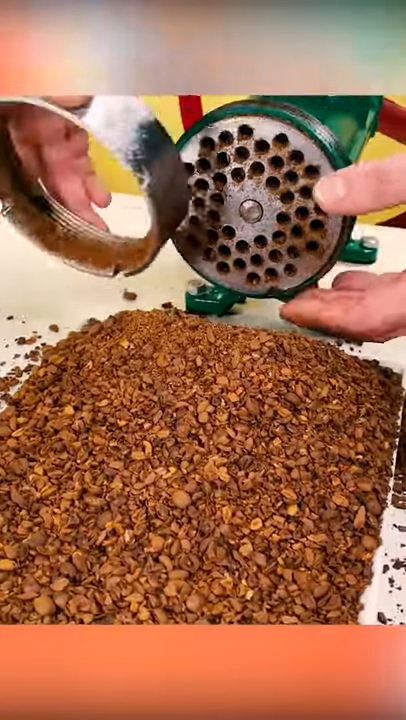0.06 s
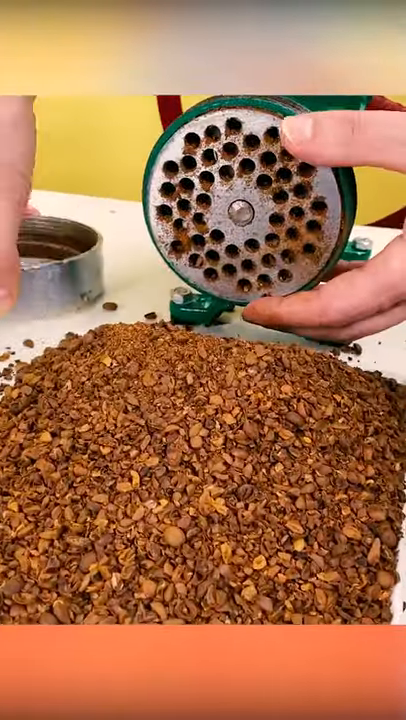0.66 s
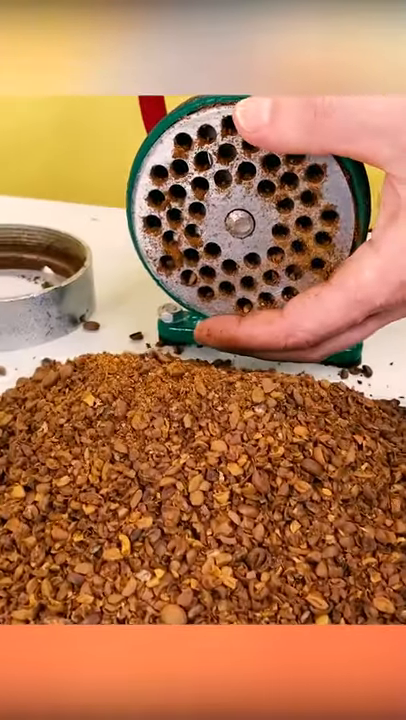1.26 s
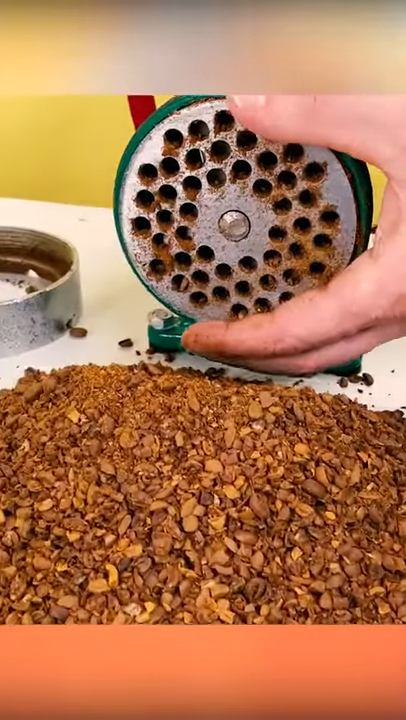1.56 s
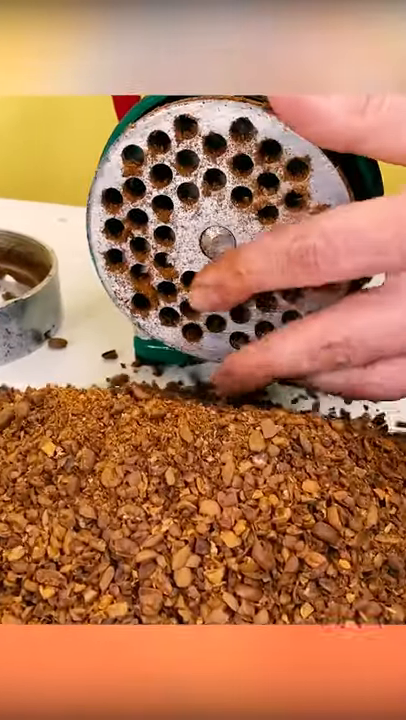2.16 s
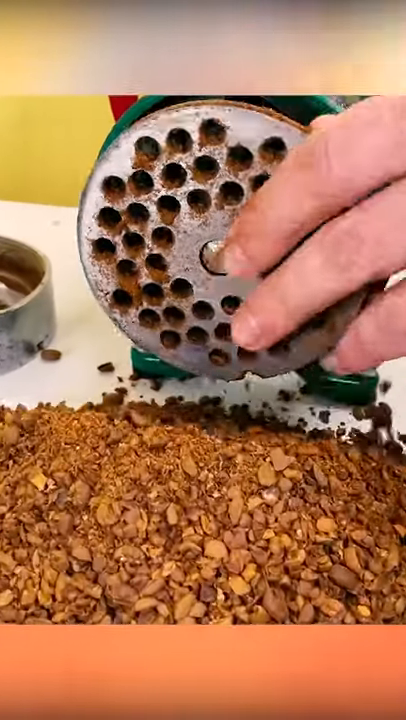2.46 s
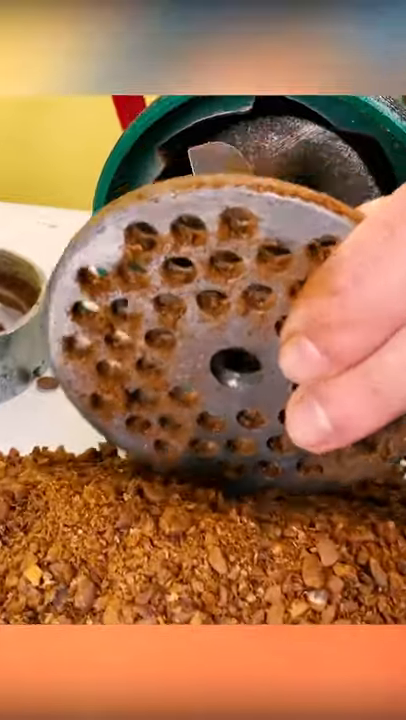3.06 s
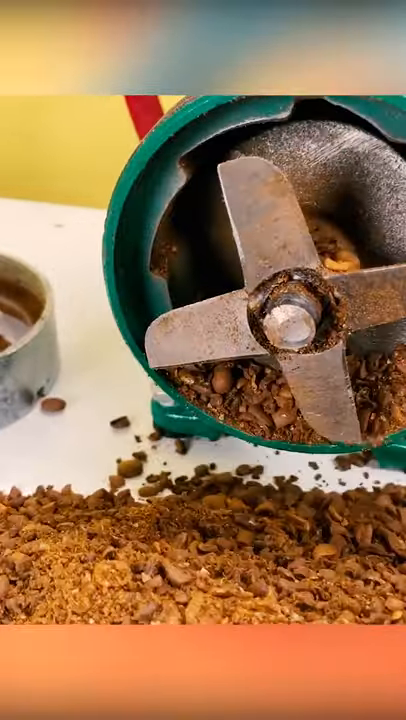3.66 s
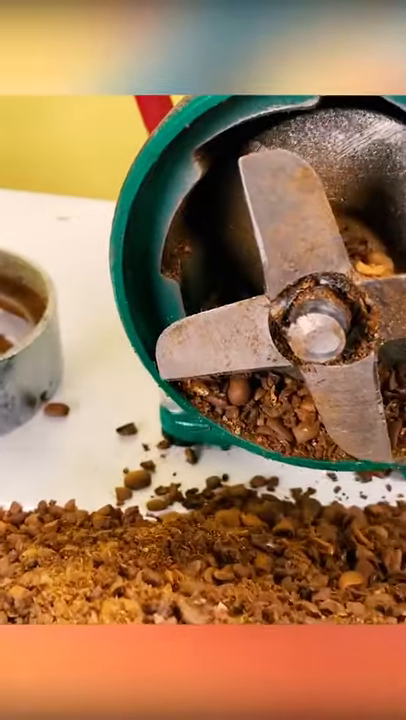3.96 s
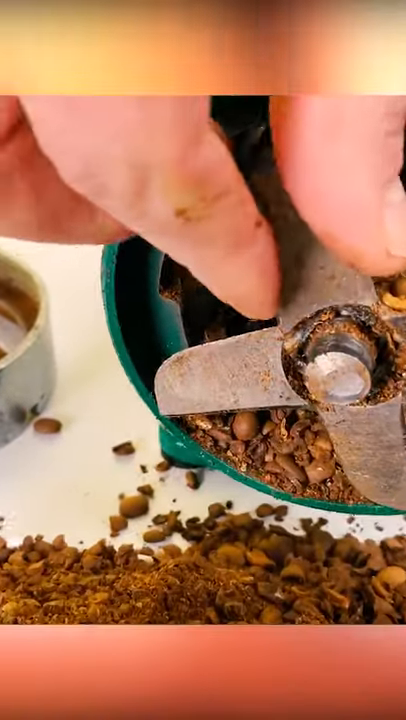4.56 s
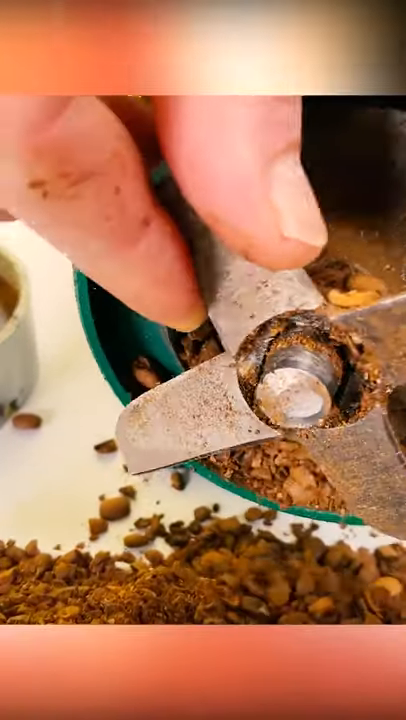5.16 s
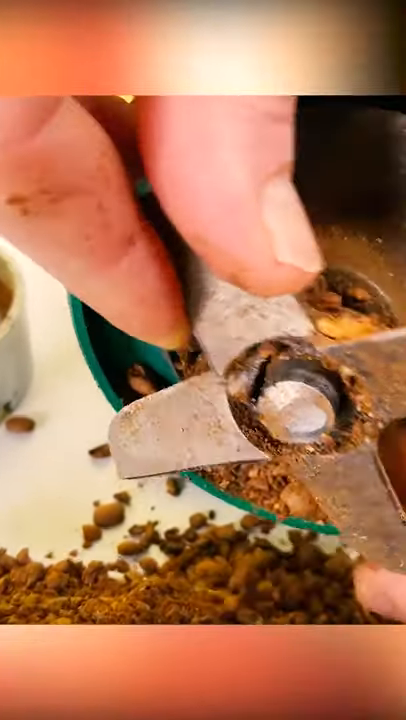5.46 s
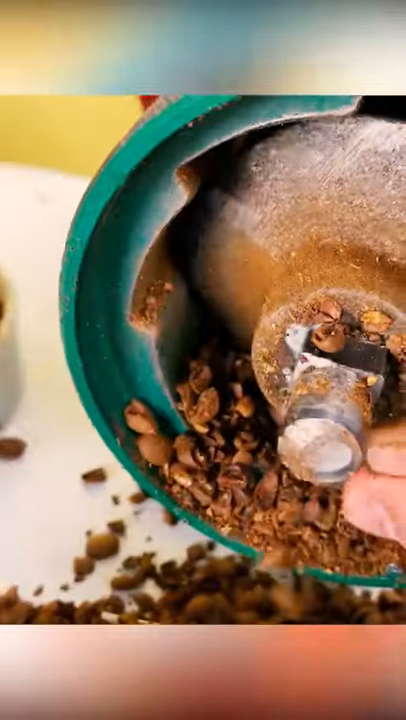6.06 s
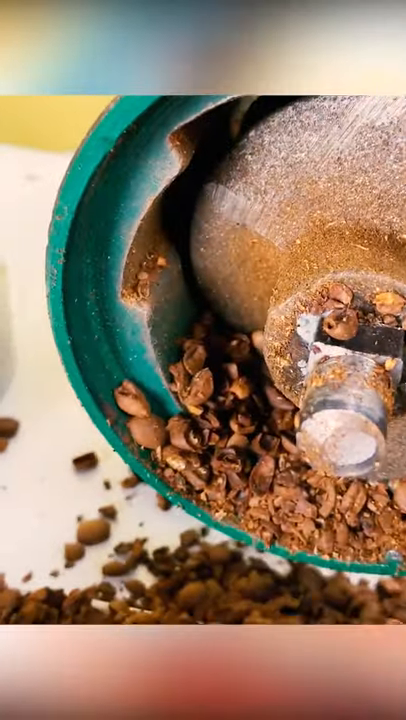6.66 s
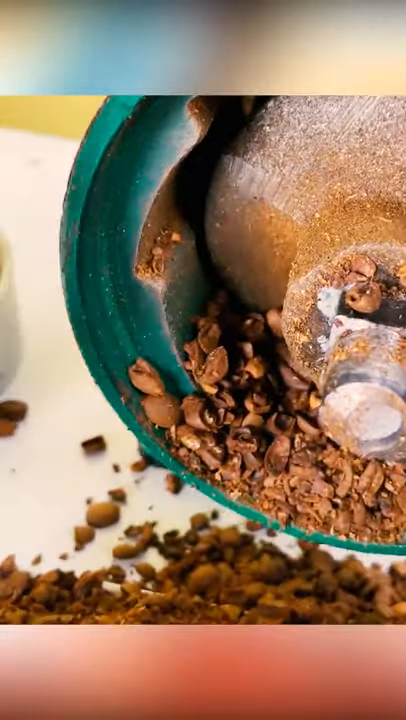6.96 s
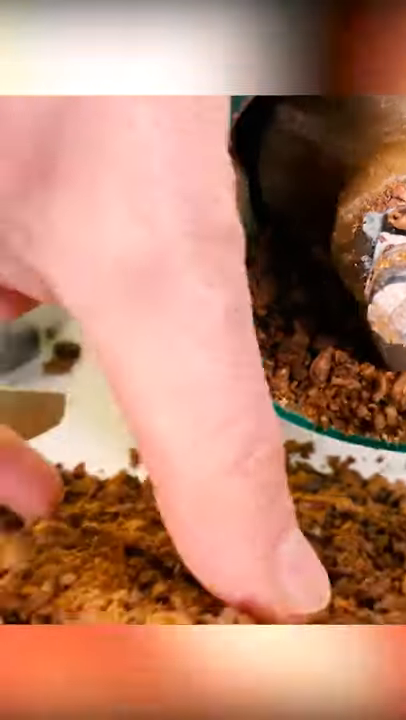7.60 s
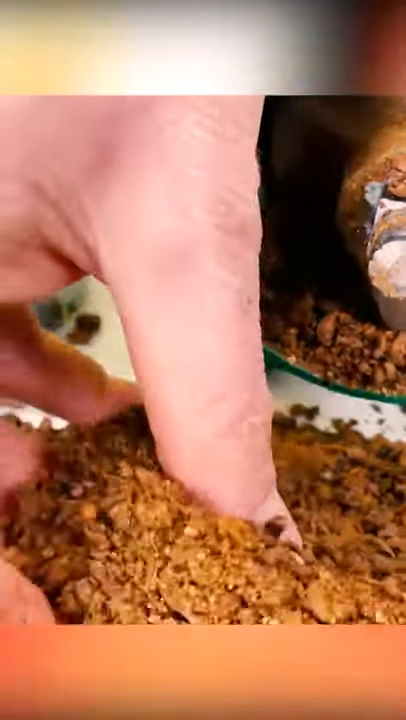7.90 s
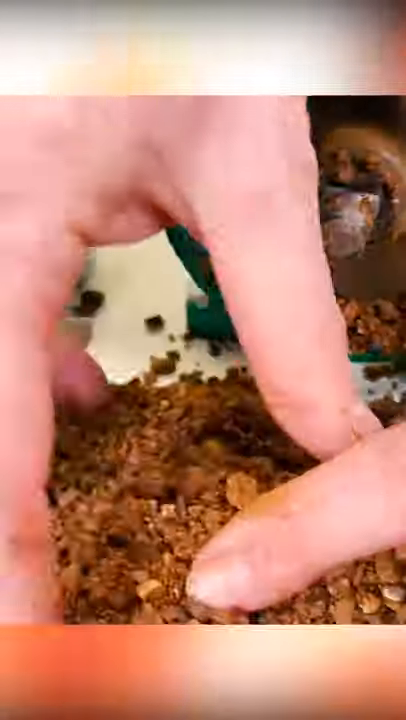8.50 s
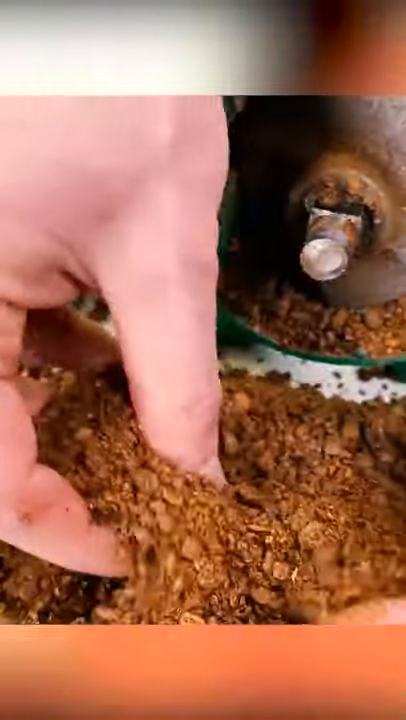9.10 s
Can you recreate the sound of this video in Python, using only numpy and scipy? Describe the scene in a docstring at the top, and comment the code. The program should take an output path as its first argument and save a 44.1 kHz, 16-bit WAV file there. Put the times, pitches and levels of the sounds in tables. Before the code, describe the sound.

A cast-iron grinder is taken apart on a table, close to the microphone in a live room with a faint low hum. At about 0.5 seconds a metal ring is put down with a solid double knock, then slides and rocks softly to rest. Around 1.8 seconds the steel plate judders loose, with a sharp clink at 2 seconds, followed by light scraping, small clinks and crunching coffee grit until about 3 seconds. Near 4 seconds the plate is laid aside with a light knock. From 4.6 to 5.7 seconds the blade is wiggled off its shaft with knocks, rasps and short metallic rings. At 6 seconds it drops with a loud, bright clatter, bouncing and skidding until about 6.6 seconds. After a short lull, from 7.4 seconds to just past 9, fingers dig through ground coffee with a softer, dry, gritty rustle and small crackles.

```python
"""A cast-iron grinder is taken apart on a table, close to a stereo microphone in a live room.
First the lock ring is put down and slides to rest. From 1.7 s the hole plate is worked loose, crushing
grit, and is laid aside. The cross knife is then wiggled off its shaft and dropped at 6 s with a clatter.
From 7.4 s fingers dig through ground coffee. Throughout, impacts excite the modes of metal and table,
friction acts in many small slips, and each brittle fracture radiates a short pulse."""
import sys
import numpy as np
from scipy import signal
from scipy.fft import rfft, irfft, next_fast_len
from scipy.io import wavfile
from scipy.ndimage import uniform_filter1d, map_coordinates

SR = 44100
rng = np.random.default_rng(int(sys.argv[2]) if len(sys.argv) > 2 else 0)


def put_to_file(sound):
    """Save the sound as 16-bit audio at rate SR, in the file named by the first command-line argument."""
    columns = np.atleast_2d(sound).T  # one column per channel
    safe = np.clip(columns, -1, 1)
    whole_steps = np.round(safe * 32767)
    wavfile.write(sys.argv[1], SR, whole_steps.astype(np.int16))


N = 411894
TOP_HZ = 16200  # band limit

# Table levels are relative: each source adds its own gain.
# Contacts of the parts with housing and table: t/s, knock level/dB, clack level/dB, tone label
# A label only selects a tone: the blow at 4.003 s is the light knock of the plate laid on the table.
BLOWS = [(0.539, -10, -25.5, "table"), (0.562, -11, -31, "table"), (0.823, -34, -42, "table"),
         (1.75, -29, -33.5, "plate rim"), (1.77, -23, -31, "plate face"), (1.776, -28.5, -24, "plate face"),
         (1.797, -22.5, -25.5, "plate face"), (1.812, -20, -27, "plate face"), (2.024, -69, -40.5, "pin"),
         (2.503, -42.5, -55.5, "plate edge"), (2.567, -42.5, -54.5, "plate edge"),
         (2.584, -43, -50.5, "plate edge"), (2.634, -44.5, -53, "plate edge"),
         (2.665, -48, -58, "plate edge"), (3.932, -57, -57, "plate face"), (4.003, -39, -35, "knife hub"),
         (4.197, -38.5, -54, "housing"), (4.346, -22, -43.5, "shaft end"), (4.805, -30.5, -35, "shaft"),
         (4.825, -28, -36.5, "shaft"), (4.911, -23.5, -41.5, "housing"), (4.938, -9, -26, "shaft end"),
         (4.957, -21.5, -29.5, "shaft"), (5.003, -22, -42.5, "shaft end"), (5.069, -31.5, -51.5, "housing"),
         (5.113, -37, -54, "housing"), (5.14, -28.5, -44, "housing"), (5.167, -23, -44.5, "housing"),
         (5.251, -29, -52.5, "housing"), (5.291, -25, -36, "housing"), (5.533, -39.5, -63.5, "table"),
         (5.571, -32, -54, "shaft end"), (6.027, -15.5, -30.5, "housing"), (6.041, -13.5, -12, "knife hub"),
         (6.06, -14, -21, "knife flat"), (6.079, -17.5, -18, "knife flat"), (6.15, -28, -26, "knife flat"),
         (6.199, -20.5, -20, "knife tip"), (6.242, -21.5, -50.5, "housing"),
         (6.266, -20.5, -49, "knife flat"), (6.301, -21.5, -48, "housing"),
         (6.463, -9.5, -11, "knife edge"), (6.531, -15.5, -17.5, "knife flat"),
         (6.545, -34, -22.5, "knife tip")]
SCRAPES = [(0.588, -19, -36, "table"), (0.818, -28, -44, "table"), (1.312, -55, -54, "foot"),
           (1.735, -34, -40.5, "plate rim"), (1.782, -29, -25.5, "plate rim"),
           (1.829, -32.5, -33, "plate rim"), (2.275, -44.5, -48, "foot"), (2.584, -32, -47.5, "housing"),
           (2.855, -44, -63, "foot"), (3.892, -41.5, -45.5, "plate face"), (4.632, -35.5, -45, "shaft"),
           (5.299, -27, -44, "housing"), (5.578, -23.5, -51.5, "housing"), (5.617, -39, -43.5, "housing"),
           (6.305, -23.5, -48, "housing"), (6.401, -22.5, -51.5, "housing"),
           (6.46, -23.5, -28, "knife edge"), (6.5, -19.5, -18.5, "knife flat")]
# Tone for each label: thud over knock/dB, tick over clack/dB, knock f/Hz, clack f/Hz,
# dip an octave below the knock/dB, left over right/dB
CONTACT_TONES = { "table": (-18, -39.5, 546.5, 924, -20, 2), "foot": (15.5, -0.5, 293, 1043.5, -9, 1.5),
                 "housing": (-9, -1.5, 238.5, 1083.5, -3, 0.2),
                 "plate face": (-0.5, 9, 505.5, 1203, -5.5, -0.7),
                 "plate edge": (-16.5, -3, 440, 797, 0, 1.7),
                 "plate rim": (8.5, -9.5, 436, 1194.5, -7.5, 2.5), "pin": (16.5, 22, 251, 4444, -8, 1.3),
                 "shaft": (3, 8, 244.5, 1577, -1, 0.5), "shaft end": (-6.5, -6, 521, 1079, -5.5, 0.5),
                 "knife hub": (-8.5, -0.5, 547, 1077.5, -2.5, 3.5),
                 "knife flat": (-20.5, -18.5, 483.5, 1109, -11, 0.5),
                 "knife edge": (-28.5, -22, 539, 1800.5, -15, 1),
                 "knife tip": (-18.5, -0.5, 494, 2535, -11, -1), }

# Impulses that set the steel ringing: t/s, level/dB
PLATE_JUDDERS = [(1.7715, -11.5), (1.7765, -17), (1.7975, -9.5), (1.8125, -11.5)]  # plate against housing
PIN_SNAPS = [(2.023, -2)]  # plate rim past the locating pin
BORE_CLINKS = [(2.4874, -37.5), (2.612, -37.5), (2.6891, -30.5), (2.706, -32.5), (2.8021, -28),
               (2.808, -31), (2.896, -38.5), (3.015, -40.5), (3.048, -36)]  # plate drawn along the shaft
PLATE_CLINKS = [(4.0021, -29)]  # plate laid aside
KNIFE_CATCHES = [(4.6341, -50.5), (4.8041, -19.5), (4.825, -22.5)]  # knife catching on the shaft
KNIFE_JERKS = [(4.9374, -23), (4.9571, -24)]  # knife jerking forward to a stop
KNIFE_RASPS = [(5.1406, -39.5), (5.273, -33), (5.2842, -42.5), (5.5741, -36), (5.5921, -35.5),
               (5.6328, -33.5), (5.6932, -44)]  # knife slipping along the shaft
TIP_STRIKES = [(6.1995, -8), (6.546, -10)]  # knife striking with its tip
EDGE_LANDINGS = [(6.4658, -5)]  # knife landing on its edge
# Bounces of the dropped knife: t/s, level/dB, treble tilt/(dB per octave)
KNIFE_BOUNCES = [(6.0428, -6.5, 12.5), (6.0969, -13, 10.5), (6.1509, -15.5, 6.5), (6.1982, -33, 3.5),
                 (6.5255, -18.5, 4.5)]
# Taps of the rocking lock ring, and squeaks of pinched grit: t/s, level/dB
RING_TAPS = [(0.807, -35.5), (0.848, -31.5), (0.939, -52), (1.001, -40.5), (1.038, -46.5), (1.059, -46.5),
             (1.112, -45), (1.163, -41.5), (1.209, -44.5), (1.235, -46), (1.249, -46.5), (1.287, -46),
             (1.453, -56)]
SQUEAKS = [(4.131, -60), (4.41, -62.5), (6.295, -44)]
# Fractures of the loudest crumbs: t/s, f/Hz, level/dB
CRUMBS = [(0.191, 5400, -55), (0.733, 5700, -52.5), (1.628, 4930, -56.5), (2.1484, 4300, -34),
          (2.167, 4360, -38), (2.2121, 4220, -38.5), (2.2302, 4430, -35.5), (2.304, 3410, -44),
          (2.4359, 4270, -40.5), (2.488, 3350, -40.5), (2.5258, 4300, -41), (2.575, 4330, -36.5),
          (2.612, 4180, -45.5), (2.6891, 3350, -35), (2.8037, 2250, -39.5), (2.867, 4400, -47),
          (2.896, 4470, -40), (3.047, 2150, -40.5), (3.538, 4560, -60), (3.717, 4640, -48.5),
          (5.411, 3760, -46.5), (6.2931, 1780, -44.5), (7.0499, 5950, -65), (7.2308, 5990, -62.5),
          (7.6124, 1740, -29), (7.658, 1620, -34.5), (8.1036, 2540, -50.5), (8.1375, 4220, -43),
          (8.3707, 5200, -41), (8.5255, 9200, -40), (9.0483, 3700, -37), (9.1128, 2300, -35.5),
          (9.268, 4080, -40)]

# Skid of the knife: t/s, hold/s, level/dB
KNIFE_SKID = [(6.24, 0.31, -53)]
# A thin, high ringing tone near 10.4 kHz during the digging: t/s, hold/s, level/dB
HIGH_TONE = [(8.83, 0.15, -50.5)]
# Parts dragged by hand: t/s, hold/s, rumble level/dB, rubbing level/dB
DRAGS = [(1.84, 0.017, -46, -34.5), (2.58, 0.054, -44, -47), (2.87, 0.2, -47, -63.5),
         (3.85, 0.2, -50.5, -61), (4.38, 0.02, -46, -49.5), (4.67, 0.048, -50.5, -50),
         (4.85, 0.029, -36.5, -52), (4.97, 0.28, -41.5, -40), (5.57, 0.048, -42.5, -60),
         (6.02, 0.026, -41.5, -46.5), (6.16, 0.16, -44.5, -38)]
# Grit crushed and spilled: t/s, hold/s, coarse level/dB, fine level/dB
CRUSHES = [(0.83, 0.08, -82.5, -76), (1.87, 0.031, -46, -60), (2.11, 0.14, -54, -56),
           (2.49, 0.55, -53, -56.5), (3.2, 0.64, -89, -67), (3.73, 0.087, -51.5, -57),
           (4.42, 0.049, -62, -63.5), (4.86, 0.13, -55, -57.5), (5.14, 0.32, -76, -69),
           (5.9, 0.14, -64, -65.5), (6.15, 0.22, -57, -59.5)]
# Envelopes of the digging: t/s, effort level/dB, hollow level/dB, treble level/dB
DIGGING = [(7.4, -110, -110, -104), (7.48, -58.5, -63, -59.5), (7.594, -65, -59, -59),
           (7.61, -47.5, -46, -49), (7.62, -45.5, -50.5, -56), (7.826, -61.5, -59, -53.5),
           (7.95, -60.5, -72.5, -56), (8.02, -60, -64, -54.5), (8.13, -55, -67, -52.5),
           (8.35, -60.5, -89, -53.5), (8.464, -70.5, -69.5, -52.5), (8.518, -51, -52, -48),
           (8.702, -55, -48.5, -53), (8.79, -48, -47.5, -47.5), (8.966, -49, -55, -48.5),
           (9.128, -54, -57, -48.5), (9.228, -61, -65, -53.5), (9.34, -53, -72, -49)]
# Low background hum, louder at the start and dipping just before the digging: t/s, level/dB
HUM_ENVELOPE = [(0, -49.5), (0.5, -59.5), (1.7, -59.5), (3.5, -59.5), (6.9, -59.5), (7.35, -71.5),
                (7.6, -55.5), (9.34, -55.5)]

# Normal modes of each part as it is supported: f/Hz, level/dB, T60/s before added damping
SEATED_PLATE_MODES = [(1200, -5, .14), (1950, 0, .13), (2550, -2, .1), (3000, -5, .09), (3500, -4, .16),
                      (3900, -3, .12), (4400, -3, .07), (5100, -7, .07), (6200, -6, .16), (6870, -5, .07),
                      (8750, -5, .05), (9100, -3, .06), (10200, -6, .06), (10600, -7, .07)]
PIN_MODES = [(2560, -14, .04), (4600, -1, .014), (5270, -14, .05), (6551, -13, .12), (8683, 0, .1),
             (9851, -17, .06)]
HANGING_PLATE_MODES = [(1949, -12, .07), (2260, -3, .045), (2700, -6, .03), (3155, -4, .04), (3467, 0, .05),
                       (4200, -5, .03), (4683, -6, .07), (6100, -12, .05)]
FREE_PLATE_MODES = [(1066, -1, .2), (2293, -13, .25), (3978, -9, .22), (5410, -21, .2), (5916, -18, .3),
                    (8215, -19, .2), (10610, -19, .13)]
CAUGHT_KNIFE_MODES = [(1085, -13, .15), (1600, -9, .08), (2492, -18, .4), (4380, -17, .2), (5250, -2, .2),
                      (6191, -3, .16), (6720, -8, .08), (7150, 2, .11), (7800, -9, .08), (8662, -10, .15),
                      (9598, -11, .1), (10620, -7, .08), (11000, -1, .07), (11250, -2, .06),
                      (12700, -4, .06), (13300, -8, .05)]
JERKED_KNIFE_MODES = [(2492, -10, .5), (4000, -6, .33), (5938, -7, .36), (6191, 0, .15), (6400, -7, .08),
                      (7200, -7, .1), (8662, -3, .14), (9650, -8, .08), (10290, -2, .2), (10450, -1, .12),
                      (13810, -7, .06)]
LOOSE_KNIFE_MODES = [(1030, -3, .25), (1220, -3, 0.3), (1600, -7, .2), (2310, -5, .07), (2470, 3.5, 0.4),
                     (3150, -12, 0.3), (4380, -7, 0.2), (5170, -13, .25), (5450, -10, 0.15),
                     (6720, -13, .2), (7120, -17, .3), (8800, -13, .15), (10150, -3, 0.12),
                     (11700, -13, .08), (13950, -11, .06)]
DROPPED_KNIFE_MODES = [(790, -4, .08), (1087, -5, .2), (1279, -7, .3), (1315, 2, .3), (1680, -4, .06),
                       (2530, -15, .14), (3341, 0.5, .25), (3362, -8, .26), (3768, -14, .14),
                       (4840, -12, .12), (5530, -5, .17), (5607, 0, .2), (5900, -14, .08), (7720, -22, .17),
                       (8430, -22, .15), (8700, -32, .12), (9750, -32, .3), (10125, -13.5, .15),
                       (11200, -24, .12), (11830, -31, .1), (12710, -28, .15), (13430, -31, .12)]
KNIFE_TIP_MODES = [(1608, -2.5, 0.02), (2580, 2, 0.032), (3230, -22.5, 0.17), (3760, -1, 0.033),
                   (3950, -6.5, 0.024), (4490, -11, 0.026)]
LANDED_KNIFE_MODES = [(790, -2, .1), (1087, -6, .15), (1315, -1, .25), (1650, -3, .09), (3341, 5, .16),
                      (3356, -8, .2), (3700, -11, .14), (5520, -11, .17), (5607, -21, .17),
                      (7720, -18.5, .17), (8430, -28, .12), (9750, -30, .38), (10125, -32, .15),
                      (11200, -22, .15), (12710, -25, .14), (13430, -30, .12)]

# Resonances: f/Hz, bandwidth/Hz, lift/dB
TABLE_PEAKS = [(63, 14, 10), (98, 12, 7), (122, 14, 5), (186, 14, 5), (235, 22, 8), (292, 18, 7),
               (374, 22, 5), (467, 36, 8), (560, 36, 4), (790, 120, 4), (1090, 50, 5), (1300, 50, 5),
               (1660, 160, 3), (1950, 160, 3), (2500, 140, 4), (3750, 260, 5)]  # table and housing
UNDER_RING_PEAKS = [(221, 29, 11.5), (507, 36, 9), (367, 30, 4.5), (782, 73, 0)]  # table beneath the lock ring
RING_PEAKS = [(1910, 220, 9), (4200, 90, 8), (4930, 90, 15), (5480, 60, 12)]  # the lock ring itself
PLATE_PEAKS = [(2300, 200, 0.5), (3400, 270, 2.5), (4400, 320, 6.5)]  # iron against which grit is crushed

# Spectra of impact: f/Hz, level/dB
THUD_SPECTRUM = [(25, -38), (42, -19), (56, 0), (78, -4), (100, 2), (135, -3), (220, -16), (500, -55)]
KNOCK_SPECTRUM = [(70, -29.5), (160, -12.5), (240, -0.5), (350, -1.5), (480, -4.5), (640, -7), (850, -17.5),
                  (1400, -24), (3000, -61)]
CLACK_SPECTRUM = [(400, -22.5), (800, 3.5), (1200, 2.5), (1480, -0.5), (1750, -1), (2200, -4), (2550, -6.5),
                  (3000, -11), (3800, -11), (5000, -14), (8000, -36)]
TICK_SPECTRUM = [(2500, -32), (4500, -1), (7000, 0), (10300, 0), (12300, -9), (14000, 0), (16500, -15.5)]
TAP_SPECTRUM = [(150, -21.5), (350, -2.5), (500, 2), (620, -7), (850, -20), (2000, -47.5), (5000, -51.5)]
# Spectra of friction: f/Hz, level/dB
IRON_RUB_SPECTRUM = [(70, -37), (140, -3), (240, 1.5), (350, -2.5), (500, -0.5), (650, -8.5), (900, -21),
                     (1400, -19.5), (3000, -48.5)]
RING_RUB_SPECTRUM = [(100, -34.5), (210, 2.5), (320, -2), (430, 1), (530, -3), (680, -5.5), (1000, -17.5),
                     (2000, -19.5), (3000, -56)]
RING_HISS_SPECTRUM = [(1500, -10), (3000, 6.5), (4300, 4), (5200, -6), (6500, -13.5), (10000, -12),
                      (16000, -19.5)]
SQUEAK_SPECTRUM = [(3000, -36), (11500, -22.5), (13400, 2), (14500, -0.5), (16200, -10)]
# Spectra of breaking and shifting coffee: f/Hz, level/dB
SNAP_SPECTRUM = [(300, -12), (1500, -8.5), (2200, -5.5), (4600, -7), (8000, -7), (15000, -6.5)]
COARSE_SPECTRUM = [(200, -15.5), (700, -2), (1200, -6), (1600, -7.5), (2300, -7), (3000, -6), (3900, -9.5),
                   (6000, -18), (10000, -32.5)]
FINE_SPECTRUM = [(2000, -9), (4200, -1.5), (6000, -0.5), (8300, -0.5), (10500, 3), (12200, -0.5),
                 (15000, 5), (15700, 1), (16200, -17)]
HEAP_SPECTRUM = [(200, -8.5), (800, -12.5), (1500, -11), (2200, -6), (4000, -4.5), (6000, -9.5),
                 (10000, -24)]
HOLLOW_SPECTRUM = [(150, -6.5), (250, -3), (500, -4.5), (780, -6), (1100, -7.5), (1650, -4), (2200, -17),
                   (3000, -30.5)]
# Spectra of the background: f/Hz, level/dB
HUM_SPECTRUM = [(25, -11), (45, -2), (60, 6), (80, -4.5), (110, -17.5), (170, -20), (300, -23),
                (600, -31.5), (1200, -33), (1800, -23), (2600, -42), (4300, -35.5), (6500, -49),
                (16000, -72.5)]
FLOOR_SPECTRUM = [(25, 8), (300, 8.5), (700, -5), (1800, -24.5), (3000, -29.5), (6000, -27), (10000, -18.5),
                  (16000, -38.5)]

# Reverberation time of the room: f/Hz, T60/s
ROOM_T60 = [(80, 1), (250, 1.1), (500, 0.87), (1000, 0.8), (2000, 1.02), (4000, 0.85), (8000, 0.5),
            (15000, 0.45)]
# Likeness of the two microphone signals: f/Hz, correlation coefficient
STEREO_CORRELATION = [(60, .99), (290, .93), (640, .7), (1050, .5), (1600, -.1), (2300, .45), (3150, .25),
                      (4200, .55), (5400, -.1), (6300, .5), (7400, 0), (8400, -.75), (9100, -.1),
                      (9750, .9), (10300, .9), (11800, -.95), (12350, -.95), (13800, .9), (14350, .9),
                      (15700, -.9)]


def blows():
    """Rise time shapes an impact: hard blows start at once, scrapes build up as the parts bind."""
    hard = amp(-7) * contacts(BLOWS, swell=.001, stretch=0.8, focus_db=9)
    soft = amp(-7.5) * contacts(SCRAPES, swell=.02, stretch=2.4, focus_db=4.5)
    return hard + soft


def contacts(rows, swell, stretch, focus_db):
    """Impact excitation: the point of contact selects which resonances of table and iron respond."""
    out = np.zeros((2, N))
    for start, knock_db, clack_db, label in rows:
        thud_db, tick_db, knock_hz, clack_hz, dip_db, pan_db = CONTACT_TONES[label]
        octave_dip = (knock_hz / 2, knock_hz / 2, dip_db)
        tabletop = [*TABLE_PEAKS, (knock_hz * 1.024, knock_hz * 0.57, focus_db), octave_dip]
        pair = [(clack_hz, clack_hz * 0.098, focus_db), (clack_hz * 2.1, clack_hz * 0.023, focus_db / 2)]
        narrow = [(hz, 80, 7) for hz in np.linspace(1700, 12000, 20) + rng.uniform(-200, 200, 20)]
        iron = [*TABLE_PEAKS, *pair, *narrow]
        thud = burst(THUD_SPECTRUM, TABLE_PEAKS, swell, t60=0.021, tail_db=-22.5, tail_t60=0.16)
        knock = burst(KNOCK_SPECTRUM, tabletop, swell, t60=0.067 * stretch, tail_db=-12.5, tail_t60=0.22)
        clack = burst(CLACK_SPECTRUM, iron, swell, t60=0.1 * stretch, tail_db=-33, tail_t60=0.25)
        tick = burst(TICK_SPECTRUM, iron, swell, t60=0.023 * stretch, tail_db=-12.5, tail_t60=0.069)
        from_table = amp(knock_db) * (amp(thud_db + 1) * thud + amp(-1) * knock)
        from_iron = amp(clack_db) * (clack + amp(tick_db - 8.5) * tick)
        add(out, start - swell, (from_table + from_iron) * pan(pan_db))
    return out


def steel():
    """Boundary conditions set the modes: plate and knife ring differently with each change of support."""
    plate = ringing(PLATE_CLINKS, FREE_PLATE_MODES, db=-5)
    seated = ringing(PLATE_JUDDERS, SEATED_PLATE_MODES, db=-15.5, damping=1.6, waver_db=3.5)
    bore = ringing(BORE_CLINKS, HANGING_PLATE_MODES, db=-10)
    pin = ringing(PIN_SNAPS, PIN_MODES, db=-13)
    catch = ringing(KNIFE_CATCHES, CAUGHT_KNIFE_MODES, db=-13.5, damping=1.2, waver_db=2.5)
    jerk = ringing(KNIFE_JERKS, JERKED_KNIFE_MODES, db=-13.5, damping=1.1, waver_db=2)
    return plate + seated + bore + pin + (catch + jerk) * pan(-2) + rasping_knife() + falling_knife()


def falling_knife():
    """Free and forced vibration: the knife rings after each bounce, and friction drives it in a skid."""
    bounces = ringing(KNIFE_BOUNCES, DROPPED_KNIFE_MODES, db=-12.5, damping=1.1, waver_db=2.2)
    landing = ringing(EDGE_LANDINGS, LANDED_KNIFE_MODES, db=-12, waver_db=1.5)
    tip = ringing(TIP_STRIKES, KNIFE_TIP_MODES, db=-2)
    sliding, = strokes(KNIFE_SKID, rise_db_per_s=301, fall_db_per_s=246.5)
    friction = noise([(600, -14), (1300, 0.5), (3400, 2.5), (5600, -5), (9000, -22.5)],
                     peaks=[(1300, 70, 22), (3360, 110, 23), (5580, 130, 22)])
    return (bounces + landing + tip + sliding * friction) * pan(4.6)


def rasping_knife(slips_per_rasp=3, scatter_s=0.0072):
    """Stick-slip excitation: flurries of small slips on the shaft keep the loose knife ringing."""
    slips = [(start + scatter_s * offset, db + 2 * size)
             for start, db in KNIFE_RASPS for offset, size in rng.standard_normal((slips_per_rasp, 2))]
    return ringing(slips, LOOSE_KNIFE_MODES, db=-17, damping=1.4)


def sliding_ring(start=0.68, hold=0.76):
    """Sliding friction weakens as the lock ring slows, the hiss fading faster than the rubbing."""
    moving, = strokes([(start, hold, 0)], rise_db_per_s=386.5, fall_db_per_s=43.5)
    age = np.maximum(np.arange(N) / SR - start, 0)
    slips = grains(RING_RUB_SPECTRUM, rate=610, spread_db=2.5, clump_db=0.5, peaks=UNDER_RING_PEAKS)
    rubbing = amp(-42 - 26 * age) * slips
    rumble = amp(-47 - 12 * age) * noise(THUD_SPECTRUM, TABLE_PEAKS)
    hiss = amp(-57 - 59 * age) * noise(RING_HISS_SPECTRUM, RING_PEAKS)
    return moving * (rubbing + rumble + hiss)


def rocking_ring():
    """Damped resonance: the table answers each touch of the rocking rim with a short dull tap."""
    out = np.zeros((2, N))
    for start, db in RING_TAPS:
        tap = burst(TAP_SPECTRUM, UNDER_RING_PEAKS, swell=0, t60=0.047, tail_db=-18, tail_t60=0.15)
        add(out, start, amp(db - 7) * tap)
    return out


def crumbs():
    """Brittle fracture: each crumb breaks in a very short snap with one resonance of its own."""
    out, t = np.zeros((2, N)), np.arange(SR // 20) / SR
    envelope = amp(-60 * t / 0.011) + amp(-10 - 60 * t / 0.05)
    for start, hz, db in CRUMBS:
        force = rng.standard_normal((2, len(t))) * envelope
        snap = unit(colour(force, SNAP_SPECTRUM, peaks=[(hz, hz / 5, 8)]))
        add(out, start, amp(db - 11) * snap)
    return out


def squeaks():
    """Frictional vibration: a grain pinched between steel faces gives a short, very high squeak."""
    out = np.zeros((2, N))
    for start, db in SQUEAKS:
        squeak = burst(SQUEAK_SPECTRUM, (), swell=0.0023, t60=0.04, tail_db=-24.5, tail_t60=0.08)
        add(out, start, amp(db) * squeak)
    return out


def dragging():
    """Stick-slip friction: iron moves on iron in small slips while the loaded table rumbles."""
    pressure, rubbing = strokes(DRAGS, rise_db_per_s=158, fall_db_per_s=80.5)
    rumble = amp(0.5) * pressure * noise(THUD_SPECTRUM, TABLE_PEAKS)
    slips = grains(IRON_RUB_SPECTRUM, rate=1100, spread_db=2, clump_db=2, peaks=TABLE_PEAKS)
    return rumble + rubbing * slips


def grit():
    """Fracture under compression: grounds crunch against the resonant iron and trickle out."""
    coarse, fine = strokes(CRUSHES, rise_db_per_s=141.5, fall_db_per_s=63.5)
    fractures = grains(COARSE_SPECTRUM, rate=4300, spread_db=2, clump_db=3.5, peaks=PLATE_PEAKS)
    crunch = amp(-5) * fractures + amp(-10.5) * crackle()
    trickle = grains(FINE_SPECTRUM, rate=4000, spread_db=2, clump_db=4.5)
    return coarse * crunch + amp(3.5) * fine * trickle


def digging():
    """Granular flow: thousands of clicks merge as fingers shift the heap; the cupped hand resonates."""
    effort, cupped, treble = envelopes(DIGGING)
    shifting = grains(HEAP_SPECTRUM, rate=4200, spread_db=-0.8, clump_db=2.5)
    crunch = amp(-0.5) * shifting + amp(-14) * crackle()
    hollow = amp(0.5) * grains(HOLLOW_SPECTRUM, rate=2600, spread_db=-3.5, clump_db=1.8,
                               peaks=[(750, 100, 8.5), (1050, 360, 4.1)])
    fizz = grains(FINE_SPECTRUM, rate=7600, spread_db=-1.5, clump_db=2.5, peaks=[(8700, 62, 2.8)])
    rumble = amp(-51) * effort / effort.max() * noise(THUD_SPECTRUM, TABLE_PEAKS)
    return effort * crunch + cupped * hollow + treble * fizz + rumble


def crackle(count=900, lowest_hz=1800, pitch_ratio=3.2, decay_cycles=3, spread_db=4.5):
    """Damped oscillation: larger pieces of bean break at random, each at its own pitch; rms 1."""
    out, t = np.zeros((2, N)), np.arange(SR // 100) / SR
    for when, pitch, size, left_phase, right_phase in rng.random((count, 5)):
        hz = lowest_hz * pitch_ratio ** pitch
        phase = np.array([[left_phase], [right_phase]])
        ring = np.sin(2 * np.pi * (hz * t + phase)) * np.exp(-hz * t / decay_cycles)
        add(out, when * N / SR, amp(spread_db * min(-np.log(1 - size), 3)) * ring)
    return unit(out)


def high_tone():
    """Narrow-band noise has pitch: a thin, high tone rings near 10.4 kHz during the digging."""
    gain, = strokes(HIGH_TONE, rise_db_per_s=250, fall_db_per_s=109)
    return gain * noise([(9500, -59), (10250, -11.5), (10420, 9.5), (10600, -16.5), (11300, -55.5)])


def reverberation(x, wet_db):
    """Convolution with a diffuse tail, each frequency decaying at its own rate."""
    hz, t, bands = signal.stft(rng.standard_normal((2, SR * 3 // 2)), SR, nperseg=256)
    decay = amp(-60 * t / along(ROOM_T60, hz)[:, None])
    tail = signal.istft(bands * decay, SR, nperseg=256)[1]
    tail = colour(tail, [(60, -2), (250, 0.5), (500, -7.5), (1000, -2.5), (2000, -5), (4000, -5.5),
                         (8000, -4.5), (15000, -15)])
    return amp(wet_db) * signal.fftconvolve(x, tail / np.linalg.norm(tail[0]), axes=1)[:, :N]


def background():
    """Background noise: a steady floor and a low hum, louder at first, dipping just before the digging."""
    hum_gain, = envelopes(HUM_ENVELOPE)
    return hum_gain * noise(HUM_SPECTRUM) + amp(-68.5) * noise(FLOOR_SPECTRUM)


def ringing(hits, modes, db, damping=1, waver_db=1):
    """Modal superposition: each hit weights the decaying modes anew; they waver as the part rattles."""
    out, t = np.zeros((2, N)), np.arange(SR * 3 // 5) / SR
    free = np.array([amp(mode_db - 60 * damping * t / t60) * np.exp(2j * np.pi * hz * t)
                     for hz, mode_db, t60 in modes])
    knots = np.arange(0, .6, .012)
    waver = np.array([np.interp(t, knots, row) for row in rng.standard_normal((len(modes), len(knots)))])
    free *= amp(waver_db * waver)
    # Each mode reaches the two microphones a quarter cycle apart.
    arrival = np.exp(1j * np.pi / 4 * np.outer([1, -1], rng.choice([-1, 1], len(modes))))
    octaves = np.log2([mode[0] for mode in modes])
    for start, hit_db, *brightness in hits:
        scatter_db, phase = rng.standard_normal((2, len(modes)))
        tilt_db = sum(brightness) * np.maximum(octaves - np.median(octaves), 0)
        weights = amp(db + hit_db + scatter_db + tilt_db) * np.exp(1j * phase) * arrival
        add(out, start, (weights @ free).imag)
    return out


def burst(spectrum, peaks, swell, t60, tail_db, tail_t60):
    """Modal overlap: noise swells, then decays at two rates; rms 1 over the 30 ms after the swell."""
    t = np.arange(SR * 2 // 5) / SR - swell
    decay = amp(-60 * np.abs(t) / t60) + amp(tail_db - 60 * np.abs(t) / tail_t60)
    envelope = np.where(t < 0, (1 + t / (swell + 1e-9)) ** 2, decay)
    x = colour(rng.standard_normal((2, len(t))) * envelope, spectrum, peaks)
    return x / np.sqrt(np.mean(x[:, (t >= 0) & (t < .03)] ** 2))


def grains(spectrum, rate, spread_db, clump_db, peaks=()):
    """Shot noise: rate clicks a second, of random pitch, size and direction, swelling in clumps; rms 1."""
    when, pitch, size, phase = rng.random((int(rate * N / SR), 4)).T
    k = np.arange(40)  # samples of one click
    decay = amp(np.minimum(-np.log(1 - size), 3.5) * spread_db)[:, None] * np.exp(-k / 7)
    angle = 2 * np.pi * pitch[:, None] * TOP_HZ * k / SR + 2 * np.pi * phase[:, None]
    at = ((when * N).astype(int)[:, None] + k).ravel()
    pair = np.array([np.bincount(at, (decay * wave(angle)).ravel(), N)[:N] for wave in (np.sin, np.cos)])
    clumps = amp(clump_db * 2 * np.tanh(wobble(45) / 2))
    return unit(colour(pair * clumps, spectrum, peaks))


def noise(spectrum, peaks=()):
    """Filtered Gaussian noise in stereo; rms 1."""
    return unit(colour(rng.standard_normal((2, N)), spectrum, peaks))


def colour(pair, spectrum, peaks=()):
    """Minimum-phase filtering of two unrelated signals, mixed as mid and side with the bass near mono."""
    n = pair.shape[1]
    m = 2 * next_fast_len(n // 2 + 2048)
    hz = np.fft.rfftfreq(m, 1 / SR)
    resonance_db = sum(lift / (1 + (2 * (hz - centre) / width) ** 2) for centre, width, lift in peaks)
    cepstrum = irfft(np.log(amp(along(spectrum, hz) + resonance_db)))
    cepstrum[1:m // 2] *= 2  # folding the cepstrum makes the filter causal
    cepstrum[m // 2 + 1:] = 0
    filtered = rfft(pair, m) * np.exp(rfft(cepstrum))
    turn = np.arccos(np.clip(along(STEREO_CORRELATION, hz), -1, 1)) / 2
    mid, side = irfft(filtered * [np.cos(turn), np.sin(turn)])[:, :n]
    return np.array([mid + side, mid - side])


def strokes(rows, rise_db_per_s, fall_db_per_s):
    """Exponential rise, hold and decay, the loudest stroke prevailing; one gain curve per level column."""
    t = np.arange(N) / SR
    loudest_db = -120
    for start, hold, *levels in rows:
        rise_db = rise_db_per_s * np.maximum(start - t, 0)
        fall_db = fall_db_per_s * np.maximum(t - start - hold, 0)
        loudest_db = np.maximum(loudest_db, np.add.outer(levels, -rise_db - fall_db))
    return amp(loudest_db)


def envelopes(rows):
    """Smoothed interpolation: one gain curve per level column, silent outside the rows."""
    times, *columns = np.transpose(rows)
    curves_db = [np.interp(np.arange(N) / SR, times, db, left=-120, right=-120) for db in columns]
    return [uniform_filter1d(amp(db), size=900) for db in curves_db]


def wobble(rate):
    """Spline interpolation through random values, rate knots a second."""
    return map_coordinates(rng.standard_normal(int(N * rate / SR) + 4), [np.arange(N) * rate / SR])


def along(points, hz):
    """Interpolation of (f/Hz, value) points on a logarithmic frequency axis."""
    f, values = np.transpose(points)
    return np.interp(np.log(hz + 1), np.log(f + 1), values)


def add(track, start, sound):
    """Superposition of a stereo sound on the track, from start in seconds."""
    part = track[:, max(round(start * SR), 0):][:, :sound.shape[1]]
    part += sound[:, :part.shape[1]]


def pan(db):
    """Level-difference stereo: gains that put left db above right."""
    return amp([[db / 2], [-db / 2]])


def amp(db):
    """Amplitude ratio of a level in decibels."""
    return 10 ** (np.asarray(db) / 20)


def unit(x):
    """Normalisation to rms 1."""
    return x / np.sqrt(np.mean(x ** 2) + 1e-20)


def scene():
    """Direct, reverberant and background sound add; ringing steel excites the room less than the rest."""
    rings = steel()
    noises = blows() + sliding_ring() + rocking_ring()
    noises += crumbs() + squeaks() + dragging() + grit() + digging() + high_tone()
    room = reverberation(noises + amp(-11) * rings, wet_db=-14.5)
    return rings + noises + room + background()


def record(dry):
    """Ideal low-pass filtering: nothing above the band limit remains."""
    m = next_fast_len(N + SR // 2)
    passband = np.fft.rfftfreq(m, 1 / SR) < TOP_HZ
    return irfft(rfft(dry, m) * passband, m)[:, :N]


dry = scene()
out = record(dry)
put_to_file(out)
```